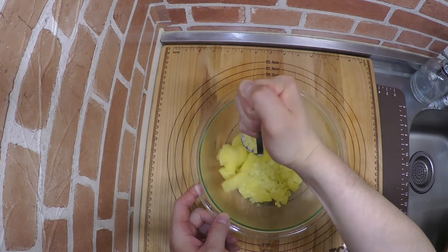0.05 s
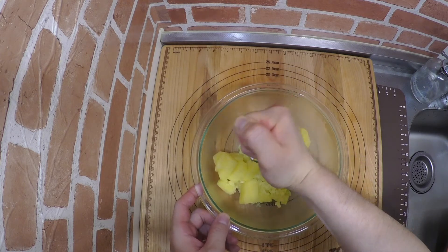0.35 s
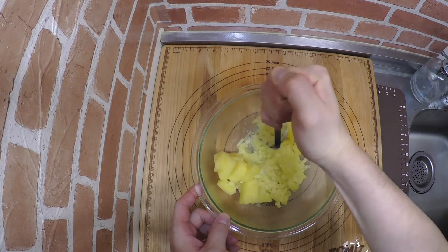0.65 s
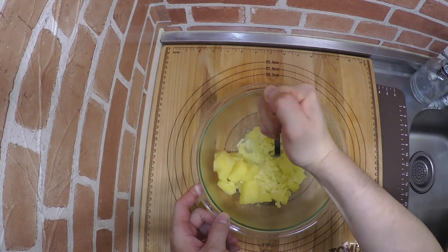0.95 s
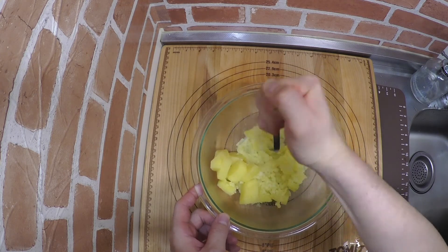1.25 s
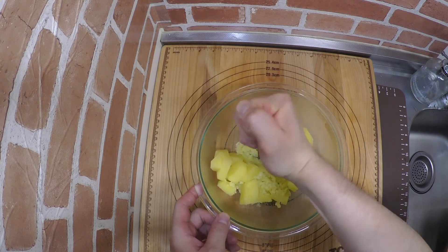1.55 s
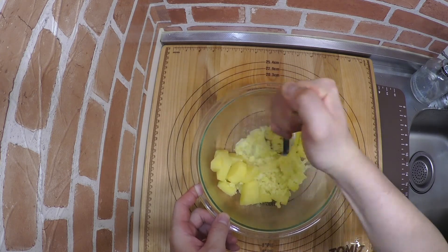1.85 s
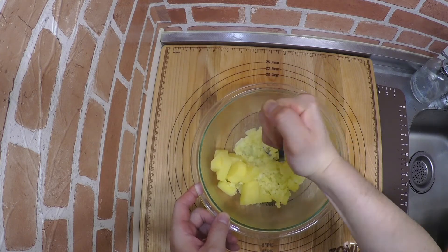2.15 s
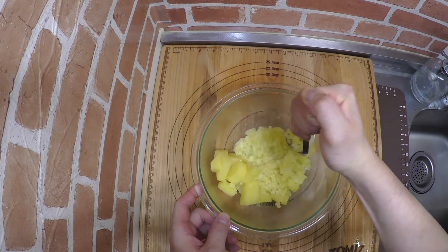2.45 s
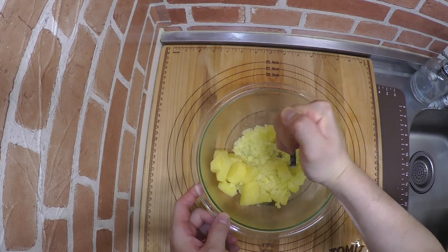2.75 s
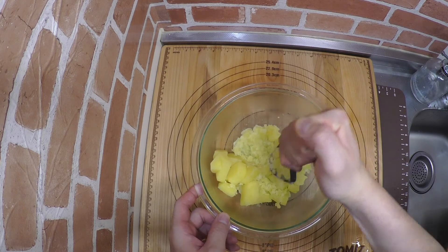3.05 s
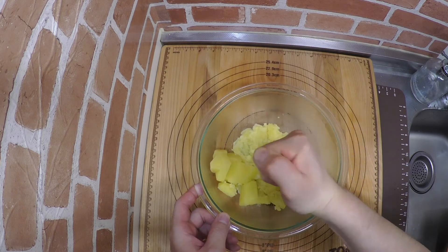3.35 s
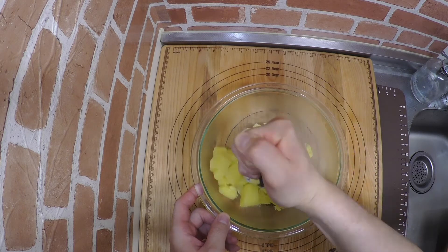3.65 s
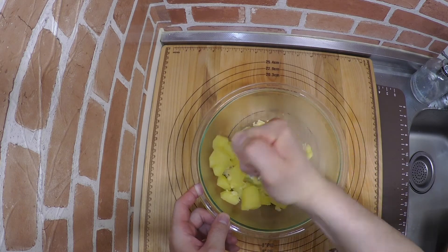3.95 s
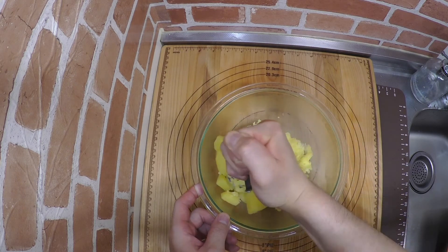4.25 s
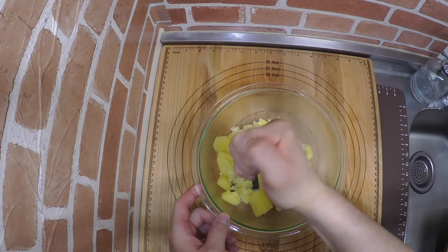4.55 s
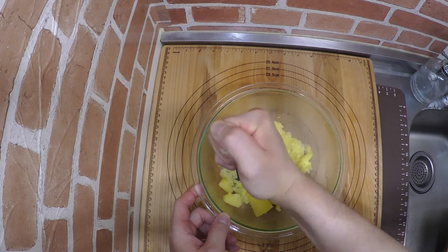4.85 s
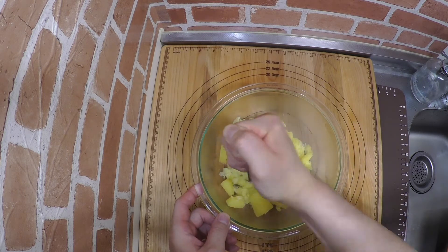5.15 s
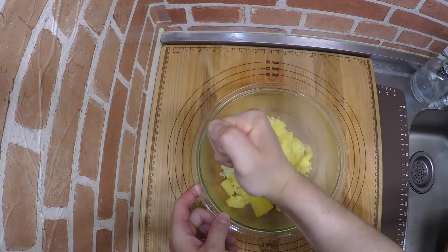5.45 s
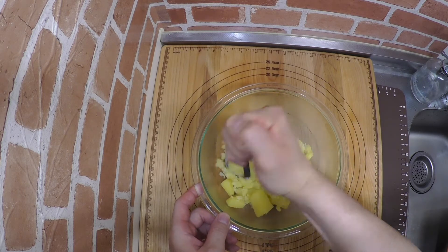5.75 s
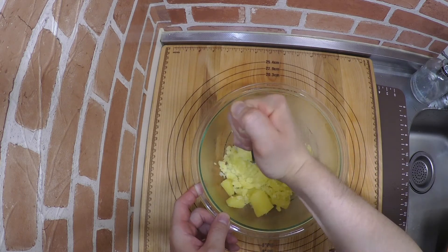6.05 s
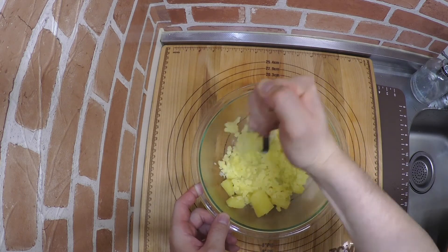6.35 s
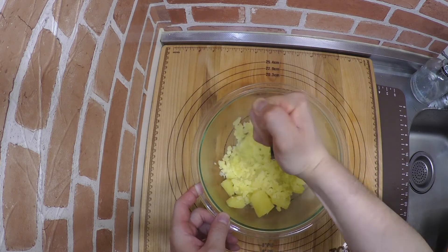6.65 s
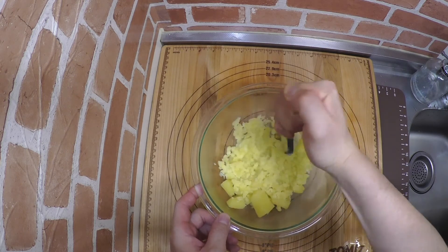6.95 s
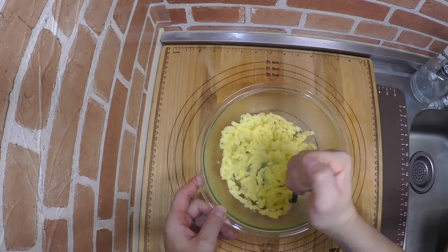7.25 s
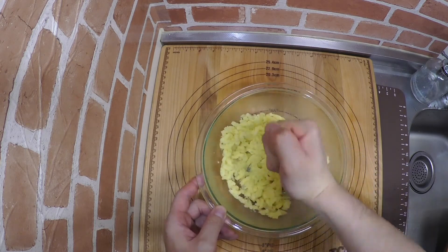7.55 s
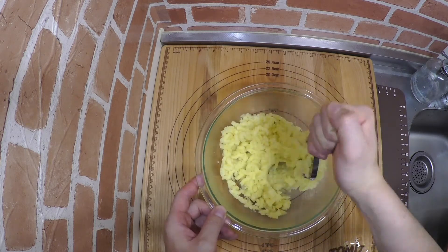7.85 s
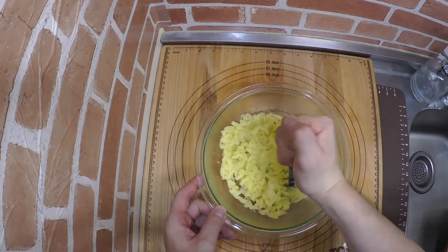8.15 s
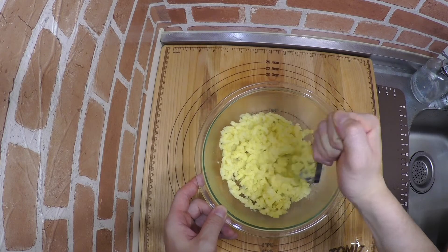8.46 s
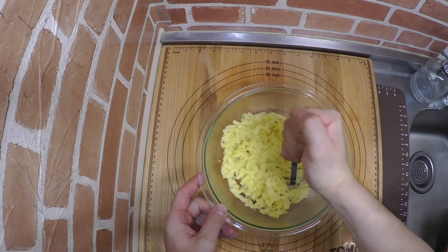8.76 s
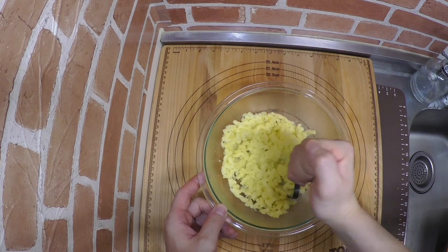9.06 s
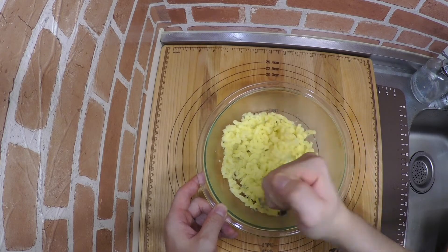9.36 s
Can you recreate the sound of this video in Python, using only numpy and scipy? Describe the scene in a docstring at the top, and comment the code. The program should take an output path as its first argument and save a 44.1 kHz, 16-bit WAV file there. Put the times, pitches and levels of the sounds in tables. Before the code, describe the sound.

A steel masher pushes through boiled potatoes in a glass bowl, making dull, uneven knocks as the bowl bumps and rattles on a wooden board. Faint wet squelches and occasional light clinks come between the strokes. The knocks soften midway, build again, and end with a few sharper hits and clinks, heard close up over low kitchen room noise.

```python
"""Mashing potatoes in a glass bowl

Boiled potatoes are mashed in a glass bowl on a wooden board, close to a camera in a small kitchen.
Each push of the steel masher lands softly, then knocks bowl and board through the mash. On the way
up it sometimes clinks the bare glass wall. The mash squelches faintly over a steady room noise."""
import sys
import numpy as np
from scipy import signal
from scipy.fft import rfft, irfft, next_fast_len
from scipy.io import wavfile

SR = 44100
rng = np.random.default_rng(int(sys.argv[2]) if len(sys.argv) > 2 else 0)


def master_out(mix):
    """Clip the mix to full scale and print it as 16-bit PCM to the path in sys.argv[1]."""
    frames = np.transpose(np.atleast_2d(mix))
    ceiling = np.clip(frames, -1, 1)
    pcm = np.round(ceiling * 32767).astype(np.int16)
    wavfile.write(sys.argv[1], SR, pcm)


N = 414981
AGE = np.arange(int(.5 * SR)) / SR  # seconds since a blow began


def undb(db):
    """Turn decibels into a number to multiply by."""
    return 10 ** (np.asarray(db) / 20)


def rms(x):
    """The average strength of a sound (root mean square)."""
    return np.sqrt(np.mean(x ** 2))


def gain_at(hz, points):
    """Read the gain at any frequency from a tone curve: a list of (Hz, dB) points."""
    point_hz, db = np.transpose(points)
    return undb(np.interp(np.log(hz + 1), np.log(point_hz), db))


def colour(x, points):
    """Filter a sound by a tone curve so that nothing sounds before its cause (minimum phase)."""
    size = 2 * next_fast_len(len(x) // 2 + 1024)
    gains = gain_at(np.fft.rfftfreq(size, 1 / SR), points)
    cepstrum = irfft(np.log(gains))
    causal = np.r_[cepstrum[0], 2 * cepstrum[1:size // 2]]
    return irfft(rfft(x, size) * np.exp(rfft(causal, size)))[:len(x)]


def noise(points, size):
    """Noise of average strength 1, shaped by a tone curve."""
    white = rfft(rng.standard_normal(2 * next_fast_len(size // 2 + 1)))
    x = irfft(white * gain_at(np.linspace(0, SR / 2, len(white)), points))[:size]
    return x / rms(x)


def fade(t60, rise):
    """A blow builds up over about `rise` seconds and dies away by 60 dB in `t60` seconds."""
    return (1 - np.exp(-AGE / rise)) * np.exp(-np.log(1000) * AGE / t60)


def ring(notes, rise, detune):
    """The fading notes of a struck object; each blow shifts their pitch and phase at random."""
    shift, phase = rng.uniform(-0.92, 1, (len(notes), 2)).T[:, :, None]
    hz, db, t60 = np.transpose(notes)[:, :, None]
    waves = np.sin(2 * np.pi * hz * (1 + detune * shift) * AGE + np.pi * phase)
    return (undb(db) * fade(t60, rise) * waves).sum(axis=0)


def add(track, start, sound):
    """Mix a sound into the track at a start time in seconds."""
    i = max(int(start * SR), 0)
    track[i:i + len(sound)] += sound[:len(track) - i]


# Tone curves of the low room noise and the high hiss. Each row: frequency in Hz, relative level in dB.
ROOM_TONE = [(15, -40.5), (25, -6), (70, -5.5), (101, 0), (190, -8.5), (231, -4), (335, -10.5), (374, -2.5),
             (465, -10), (632, -5.5), (752, -8), (1330, -6.5), (2910, -19), (4040, -38), (4600, -70),
             (5980, -76.5), (10100, -120)]
HISS_TONE = [(3410, -59), (5800, -28), (5900, -29.5), (6530, -16), (7630, -17.5), (9070, -11.5),
             (12100, -18.5), (15100, 0), (15900, -8.5)]


def background():
    """Room noise that wavers slightly, faint mains hum and a thin hiss."""
    knots = np.arange(0, N, SR // 9)
    waver_db = 0.46 * np.interp(np.arange(N), knots, rng.standard_normal(len(knots)))
    room = noise(ROOM_TONE, N) * undb(-49 + waver_db)
    hum = undb(-60) * np.sin(2 * np.pi * 99 * np.arange(N) / SR)
    hiss = noise(HISS_TONE, N) * undb(-69.5)
    return room + hum + hiss


def squelch(length, db, tone):
    """Tiny wet cracks, a few of them large, swell and ebb as the mash gives way; the bowl smears them."""
    size = int(length * SR)
    happens = rng.random(size) < 3000 / SR  # about 3000 cracks a second
    cracks = happens * rng.standard_normal(size) * undb(4.1 * rng.exponential(size=size))
    smear = (rng.standard_normal(len(AGE)) * fade(0.043, rise=.0002))[:SR // 20]
    wet = colour(signal.fftconvolve(cracks * np.hanning(size), smear), tone)
    return wet * undb(db) / (rms(wet[:size]) + 1e-12)


# Tone curves of wet mash and of its finest bursting films.
# Each row: frequency in Hz, relative level in dB.
MASH_TONE = [(200, -1), (800, 5), (2000, 5), (3200, -0.5), (4200, -21), (8000, -30)]
CRACKLE_TONE = [(2000, -22.5), (4500, -10), (6600, -4.5), (7800, -6.5), (8900, 0.5), (10400, -6),
                (12500, -6.5), (15000, -1.5)]


def squish(length, db):
    """Mash giving way: a squelch with a quieter, fine crackle on top."""
    return squelch(length, db, MASH_TONE) + squelch(length, db - 11.5, CRACKLE_TONE)


# Larger pockets of wet mash. Each row: start in seconds, length in seconds, level in dB.
SQUELCHES = [(0.16, 0.092, -53), (0.29, 0.035, -54), (.322, 0.017, -47.5), (0.996, 0.046, -44),
             (2.087, 0.16, -57), (2.743, 0.024, -50), (3.681, .15, -59), (3.848, 0.012, -49),
             (4.3, 0.29, -60.5), (4.954, 0.023, -52.5), (6.022, .02, -55.5), (6.597, 0.18, -56.5),
             (7.984, 0.012, -46), (8.1, 0.21, -61.5)]


def mash():
    """Pockets of mash squeeze through the masher, with faint squelches at random in between."""
    out = np.zeros(N)
    for start, length, db in SQUELCHES:
        add(out, start, squish(length, db))
    faint_per_second = 1.5
    for when, size, strength in rng.random((int(faint_per_second * N / SR), 3)):
        add(out, when * N / SR, squish(length=0.05 + 0.1 * size, db=-64 + 2 * strength))
    return out


# Tone curve of the kitchen's echo. Each row: frequency in Hz, relative level in dB.
ECHO_TONE = [(30, -24), (70, -3.5), (130, 1.5), (260, -2.5), (400, -12), (600, -7), (1300, -10),
             (2000, -19), (3200, -37.5), (4500, -55), (15000, -61)]


def kitchen_echo():
    """The room answers a knock with a wash of noise whose low part comes late and stays longer."""
    wash = noise(ECHO_TONE, len(AGE))
    low = signal.sosfiltfilt(signal.butter(2, 247, fs=SR, output="sos"), wash)
    return low * fade(0.62, rise=0.031) + (wash - low) * fade(0.2955, rise=0.011)


# The notes of the full bowl on its board, and those of the free glass wall.
# Each row: pitch in Hz, relative level in dB, basic time to fade by 60 dB in seconds.
BOARD_NOTES = [(135, -15.5, 0.54), (226.8, -6, 0.19), (252, -5.5, 0.24), (344.8, -3, 0.19),
               (370.8, -3.5, 0.1973), (404.4, -2.5, 0.21), (448.3, -7.5, 0.13), (534, -8.5, 0.15),
               (560.5, -9, 0.19), (672, -16.5, .12), (746.1, -5, 0.15), (839, -4, 0.13), (893, -6.5, 0.13),
               (1073.8, -6, 0.176), (1175, -6, 0.075), (1246, -2, 0.128), (1291, -5.5, 0.16),
               (1396, -6, 0.12), (1440, -7.5, 0.094), (1655, -11.5, 0.13), (1720, -15, 0.1),
               (1775, -19.5, 0.15), (1860, -12.5, 0.1), (1925, -20.5, 0.23), (2073, -13, 0.11),
               (2390, -23, 0.096), (2640, -23.5, 0.13), (2910, -26, .08)]
GLASS_NOTES = [(741.7, 4, 0.38), (1984, 6.5, 0.27), (3628, -0.5, 0.07), (3692, -2.5, 0.058),
               (3740, -1, 0.052), (7900, -22.5, 0.045), (8660, -13, 0.04), (9210, -18, 0.035),
               (9800, -15, 0.04), (10500, -16, 0.063), (10560, -17, 0.04), (11700, -18, 0.057),
               (14050, -16.5, .03), (15350, -14, .03)]
# Tone curves of steel meeting glass through a skin of mash, and of a knock's short thud.
# Each row: frequency in Hz, relative level in dB.
CRUNCH_TONE = [(500, -9), (1200, -0.5), (1900, 0), (2800, -1.5), (3400, -17), (4300, -31), (8000, -45)]
THUD_TONE = [(40, -29), (130, -20), (240, 8), (370, 4.5), (490, -1.5), (740, 3.5), (990, -3.5), (1250, 4),
             (1800, -12.5), (2250, -14.5), (2800, -20.5), (4000, -57), (7000, -51.5), (15000, -45)]


def knock(db, brightness, bass_db, chatter_db):
    """Bowl and board are struck through the mash; a harder push has a shorter contact and rings longer."""
    cushion = undb(-.45 * (db + 8.5))  # gentle pushes sink into the potato and build up slowly
    stretch = undb(0.18 * (db + 3.5))
    crunch = noise(CRUNCH_TONE, len(AGE)) * fade(0.051, rise=0.00048 * cushion) / max(cushion, 1)
    notes = [(hz, level, t60 * stretch) for hz, level, t60 in BOARD_NOTES]
    body = ring(notes, rise=0.0019 * cushion, detune=0.0024)
    thud = noise(THUD_TONE, len(AGE)) * fade(0.044, rise=0.0051 * cushion)
    # as the push goes on, the bowl chatters on the board and keeps its notes going
    chatter = ring(BOARD_NOTES, rise=0.032, detune=0.013)
    chatter += undb(8.5) * noise(THUD_TONE, len(AGE)) * fade(0.143, rise=0.046)
    chatter *= 1 - np.exp(-AGE / 0.022)  # it sets in only after the first blow
    wall_hum = ring(GLASS_NOTES[:1], rise=0.032, detune=0.00092)
    blow = undb(-11) * crunch + undb(-3.5) * body + undb(8.5) * thud + undb(chatter_db - 4.5) * chatter
    blow += undb(0.89 * chatter_db - 18.5) * wall_hum  # a chattering bowl keeps its wall humming
    blow += undb(.5 * chatter_db - 10.5) * kitchen_echo()
    blow = colour(blow, [(230, bass_db), (500, 0), (3200, brightness * np.log2(3200 / 500))])
    return blow * undb(db - 11.5) / rms(blow[:SR // 40])  # the first 25 ms set the level


# Down strokes. Each row: time of the knock in seconds, strength in dB, brightness in dB per octave,
# extra bass in dB, chatter in dB, seconds spent sinking through the mash before the knock.
PUSHES = [(0.203, -26.5, -8, 0, -6, .012), (0.525, -11, -3.5, -4, 5.5, 0.024),
          (1.242, -11.5, -4, -5, 5, 0.029), (1.755, -22, -4.5, -0.5, 4.5, 0.00085),
          (2.311, -8.5, -3.5, -2, 7.5, .031), (2.948, -4.5, 0.4, 0.5, 0.5, .028),
          (3.465, -32, -9, 0, -9, .017), (3.968, -35.5, -3.5, -5, -5, 0.00058),
          (4.547, -40.5, -4, -12, -5, 0), (4.98, -37.5, -10, -11, -4, 0.0011),
          (5.209, -25.5, -3.5, 2.5, 1.5, 0.033), (5.789, -16.5, -3, -1.5, 2, .036),
          (6.339, -8.5, -2.5, -3.5, 11.5, .035), (6.842, -2, -4.5, -6.5, 3, 0.042),
          (7.441, -37.5, -1, 0, -7, 0.00099), (8.348, -2.5, .6, -4, -11, 0),
          (8.859, -8.5, -1.8, -1, -8.5, 0)]


def pushes():
    """The masher enters the mash, lands softly on it, then knocks the bowl onto the board."""
    out = np.zeros(N)
    for start, db, brightness, bass_db, chatter_db, sink in PUSHES:
        add(out, start - .0015, knock(db, brightness, bass_db, chatter_db))
        # the soft landing and the wet sounds grow only slowly with the force of the push
        landing = start - sink
        add(out, landing, knock(-14.5 + .65 * db, brightness=-3.5, bass_db=-3, chatter_db=-0.92))
        add(out, landing - .025, squish(length=0.036, db=-54 + .4 * db))
        add(out, start - .02, squelch(length=0.077, db=-65.5 + .35 * (db + 5.5), tone=CRACKLE_TONE))
    return out


# Up strokes. Each row: start in seconds, strength in dB.
LIFTS = [(0.826, -33), (0.849, -34.5), (1.523, -19.5), (2.029, -33), (3.263, -35), (3.8, -32),
         (5.581, -29.5), (6.014, -34), (6.078, -33), (6.56, -23), (7.057, -22.5)]


def lifts():
    """The sticky mash lets go of the rising masher and the bowl settles with a dull bump."""
    out = np.zeros(N)
    for start, db in LIFTS:
        add(out, start, knock(db, brightness=-3, bass_db=5.5, chatter_db=-6.5))
    return out


# Tone curves of the masher's steel tick and dry clack. Each row: frequency in Hz, relative level in dB.
TICK_TONE = [(50, -8), (300, 16), (1500, 11.5), (2600, -2), (3700, -3), (4300, -6), (6200, -21),
             (7000, 1.5), (7900, -20), (8800, 14), (10400, -3), (12300, -11), (14200, 0.5), (15500, -3)]
CLACK_TONE = [(800, -24.5), (1600, -4), (2400, 2), (3000, -2.5), (3500, -7), (4500, -31), (8000, -33)]
# Steel touching the glass wall. Each row: start in seconds, then the strengths in dB of the treble,
# the dull body, the clack and the low wall notes, then the second wall note's extra push in dB.
CLINKS = [(1.0036, -44, -52, -42, -53.5, 3), (1.0248, -48, -47, -51, -57, 3),
          (1.5613, -37.5, -33.5, -43, -49.5, 2), (1.6425, -40.5, -41, -36, -59, -8),
          (2.0327, -48, -42.5, -40.5, -61, 0.5), (2.5196, -25, -35.5, -42, -40, 4),
          (5.4988, -31, -31, -44, -45, -4), (8.532, -22, -30, -33, -34, -8),
          (9.0478, -24.5, -26, -44, -34.5, 6.5)]


def clink(treble_db, body_db, clack_db, ring_db, place_db):
    """A steel tick rings the glass; the place it touches decides how strongly each low note answers."""
    odd_db, even_db = ring_db - place_db / 2, ring_db + place_db / 2
    # the third wall note is split in three; all the notes above it follow the treble
    drives = [odd_db, even_db] + [odd_db] * 3 + [treble_db] * (len(GLASS_NOTES) - 5)
    wall_notes = [(hz, level + drive, t60) for (hz, level, t60), drive in zip(GLASS_NOTES, drives)]
    wall = ring(wall_notes, rise=0.0013, detune=0.0014)
    # echoes from the brick walls mix with the ring and make it waver
    echoes = rng.standard_normal(len(AGE)) * fade(0.18, rise=.012)
    reflected = signal.fftconvolve(wall, echoes / np.linalg.norm(echoes))[:len(AGE)]
    glass = undb(-0.5) * wall + undb(-11) * reflected
    tick_shape = fade(0.023, rise=0.00031) + undb(-19) * fade(0.166, rise=0.0018)
    tick = noise(TICK_TONE, len(AGE)) * tick_shape
    clack = noise(CLACK_TONE, len(AGE)) * fade(0.055, rise=0.00025)
    # a sideways touch rocks mainly the low notes of bowl and board
    body_notes = [(hz, level - 3.9 * np.log2(hz / 250), t60) for hz, level, t60 in BOARD_NOTES]
    body = ring(body_notes, rise=0.0023, detune=0.0068)
    return glass + undb(treble_db + 2.5) * tick + undb(clack_db + 1.5) * clack + undb(body_db - 2.5) * body


# The camera housing swallows a band of the treble. Each row: frequency in Hz, level change in dB.
HOUSING_TONE = [(3700, 0), (4200, -5.5), (4700, -12.5), (5700, -15), (6300, -3.5)]


def scene():
    """Bowl and mash, heard through the camera housing, over the room noise."""
    room = background()
    bowl = pushes() + lifts()
    for start, *levels in CLINKS:
        add(bowl, start, clink(*levels))
    return (colour(bowl + mash(), HOUSING_TONE) + room)[None]


# The outline of two brief dips in level. Each row: time in seconds, level change in dB.
LEVEL_DIPS = [(7.184, 0), (7.187, -22), (7.201, -24), (7.204, 0), (8.535, 0), (8.57, -7), (8.65, -8),
              (8.86, -1), (8.95, 0)]


def record(dry):
    """The level dips briefly twice, and the treble is cut steeply above 15900 Hz."""
    dip_db = np.interp(np.arange(N) / SR, *np.transpose(LEVEL_DIPS))
    treble_cut = signal.ellip(10, .2, 70, 15900, fs=SR, output="sos")
    return signal.sosfilt(treble_cut, dry * undb(dip_db))


dry = scene()
out = record(dry)
master_out(out)
```